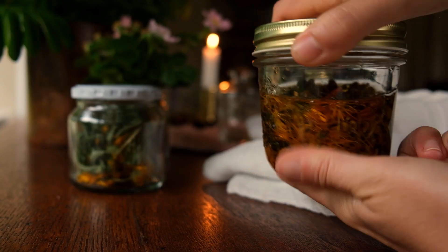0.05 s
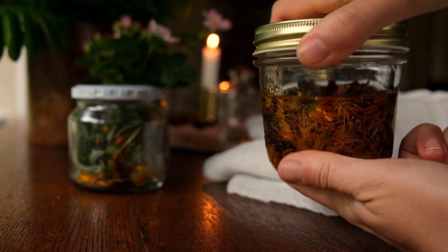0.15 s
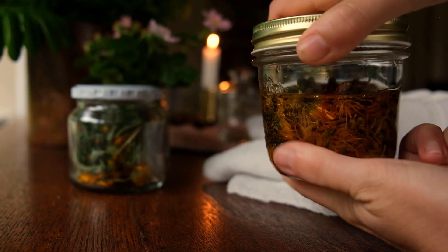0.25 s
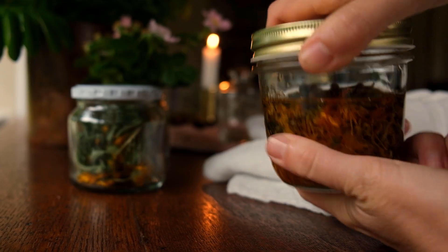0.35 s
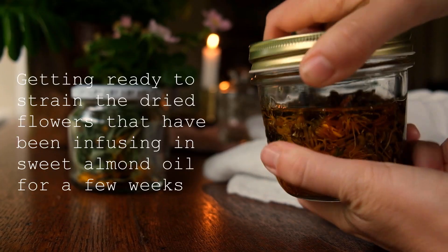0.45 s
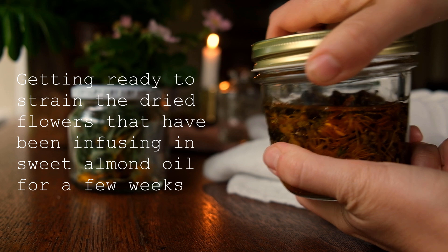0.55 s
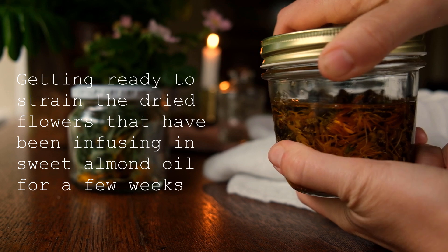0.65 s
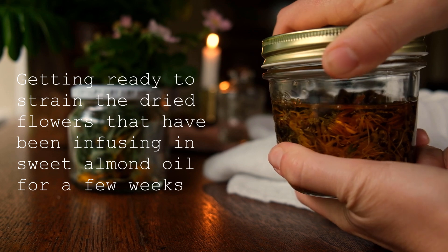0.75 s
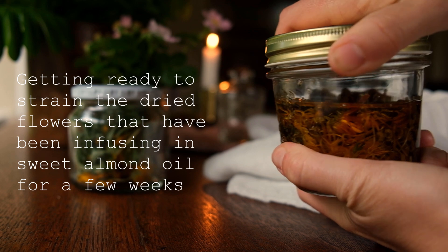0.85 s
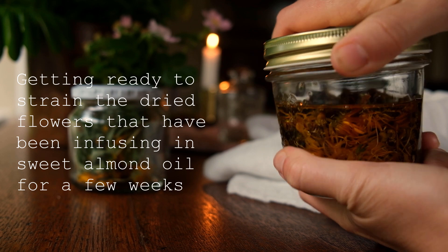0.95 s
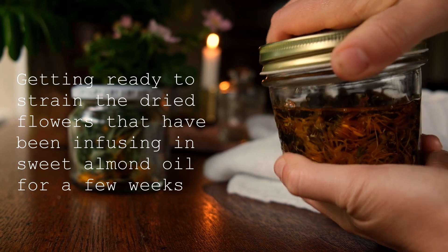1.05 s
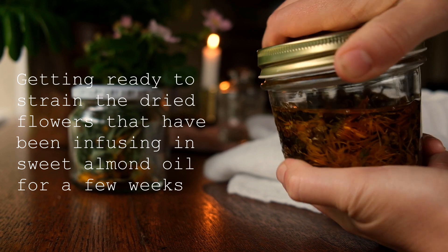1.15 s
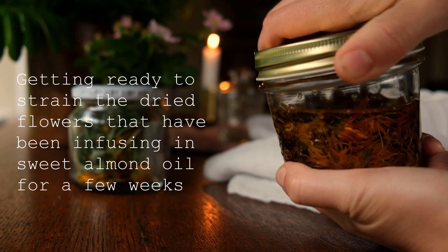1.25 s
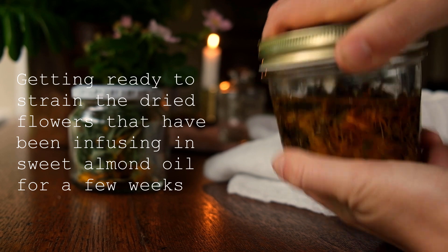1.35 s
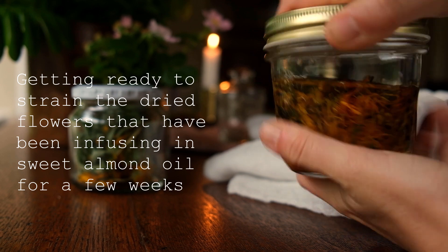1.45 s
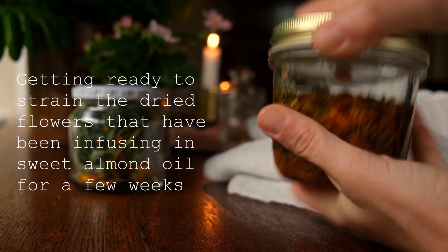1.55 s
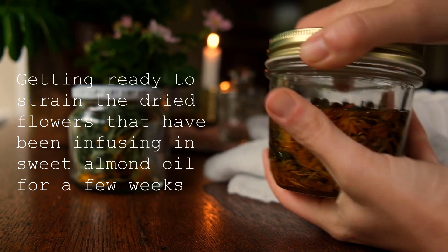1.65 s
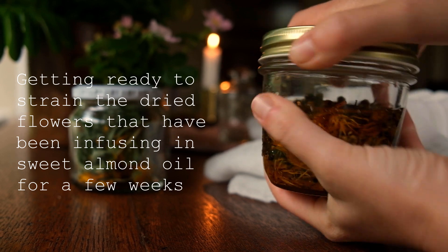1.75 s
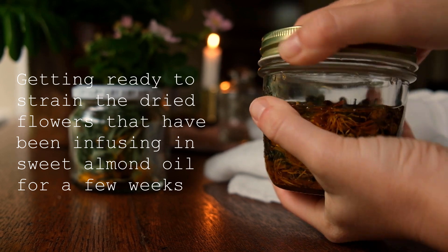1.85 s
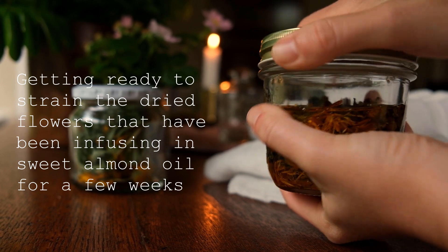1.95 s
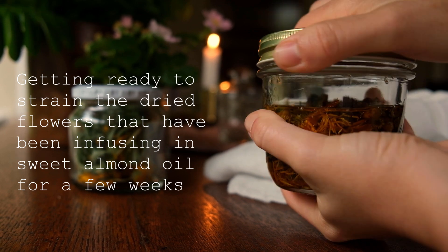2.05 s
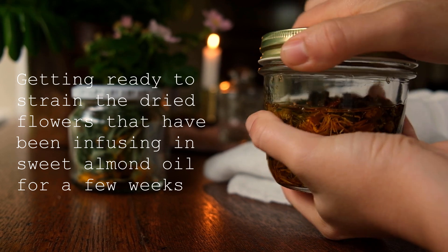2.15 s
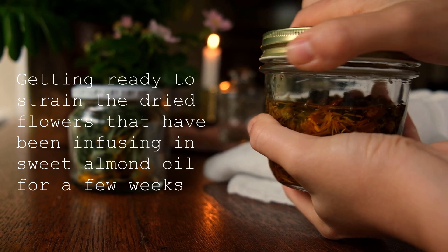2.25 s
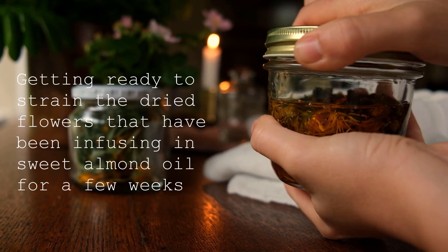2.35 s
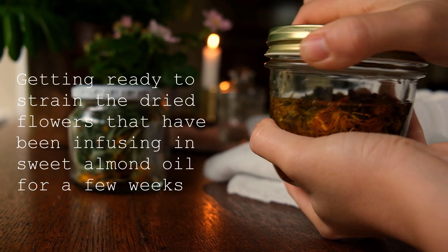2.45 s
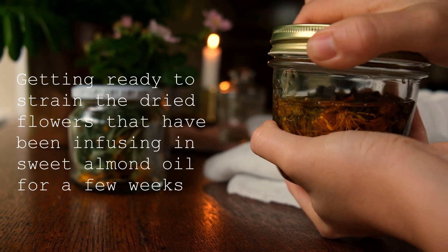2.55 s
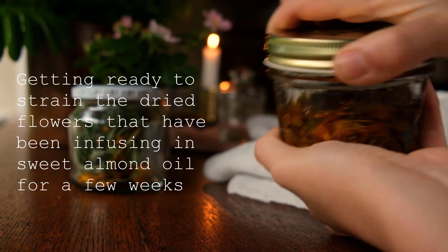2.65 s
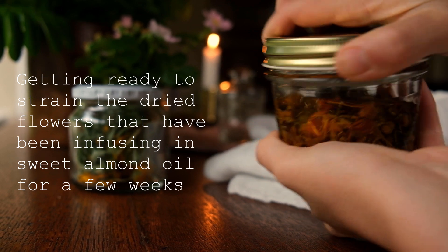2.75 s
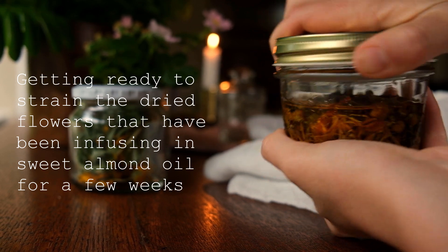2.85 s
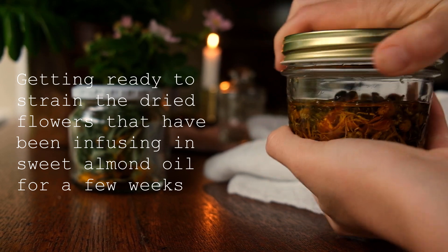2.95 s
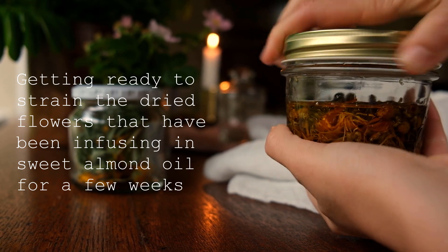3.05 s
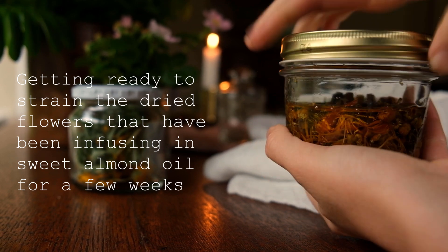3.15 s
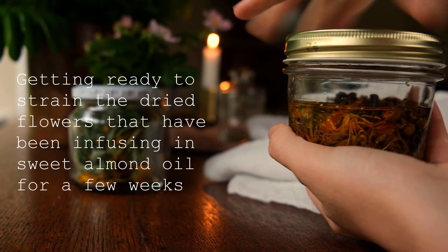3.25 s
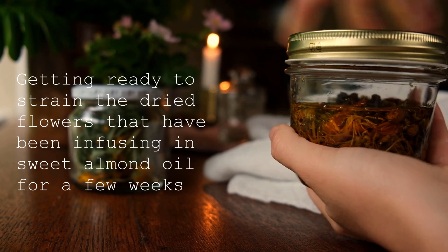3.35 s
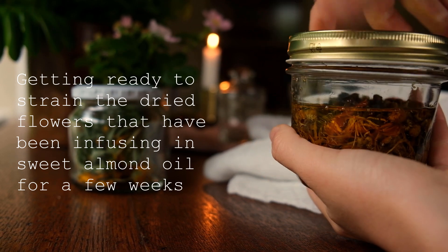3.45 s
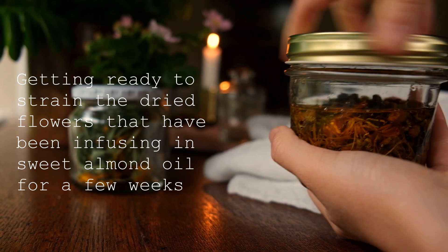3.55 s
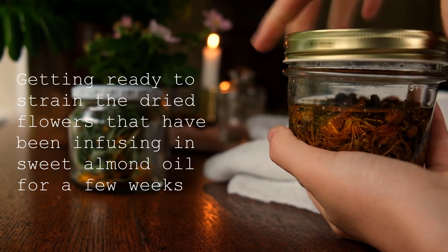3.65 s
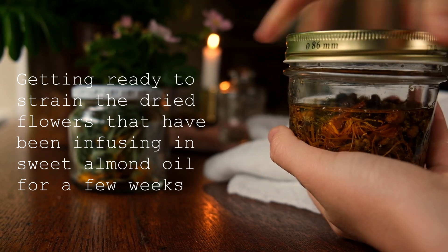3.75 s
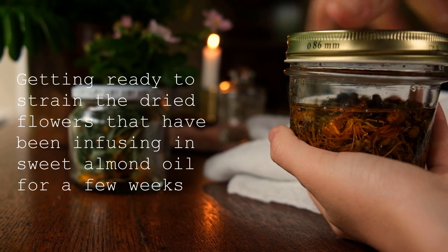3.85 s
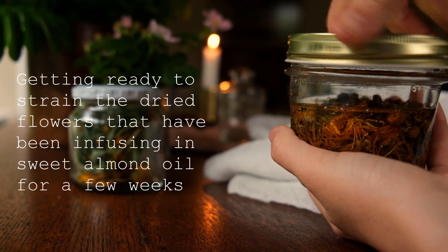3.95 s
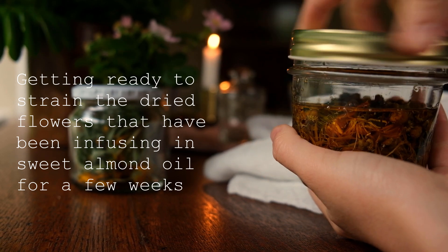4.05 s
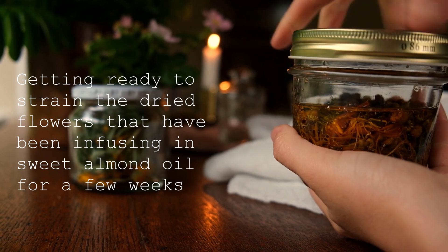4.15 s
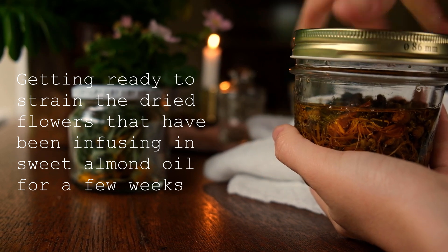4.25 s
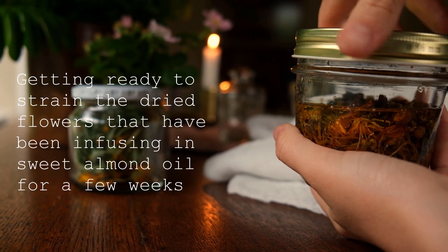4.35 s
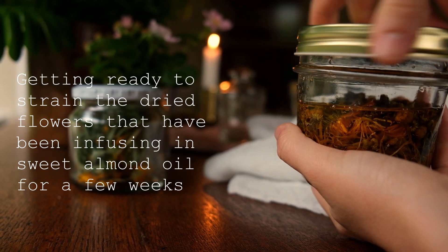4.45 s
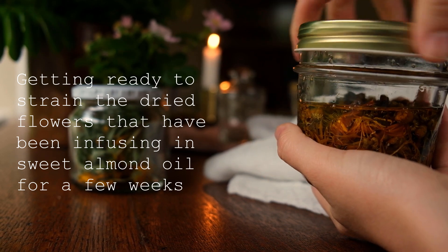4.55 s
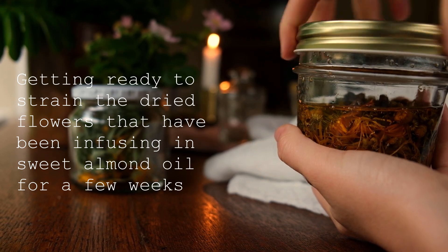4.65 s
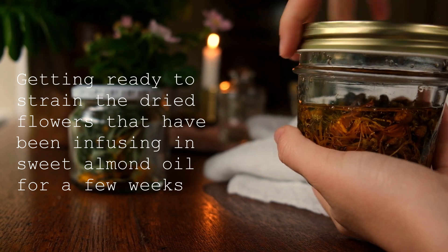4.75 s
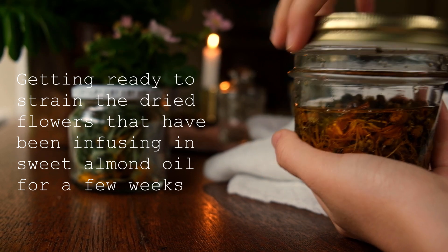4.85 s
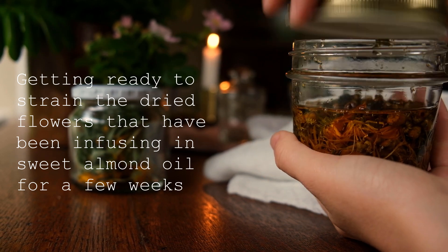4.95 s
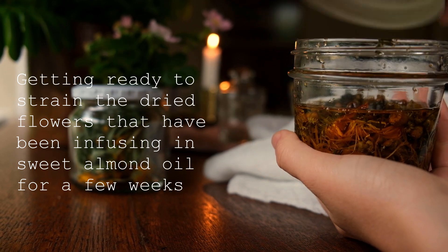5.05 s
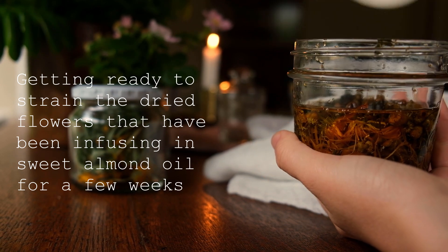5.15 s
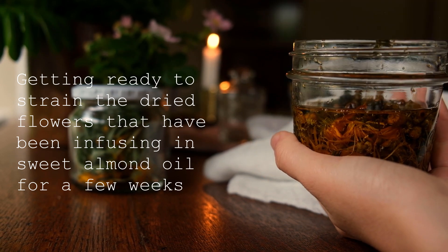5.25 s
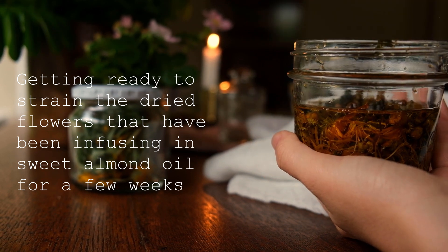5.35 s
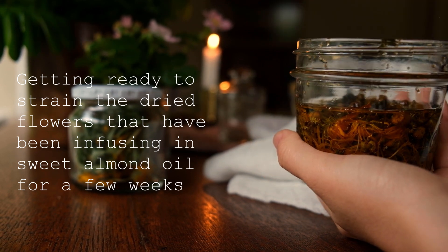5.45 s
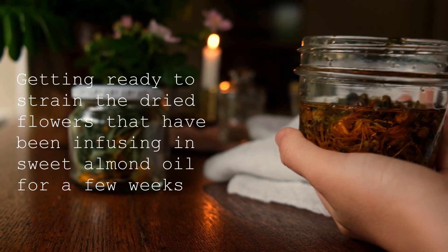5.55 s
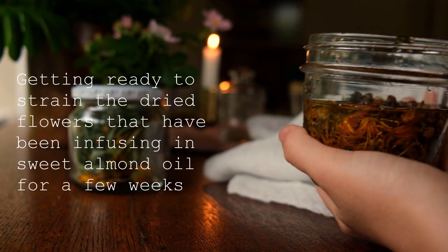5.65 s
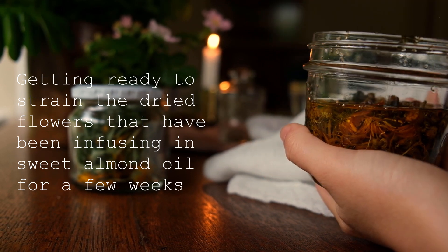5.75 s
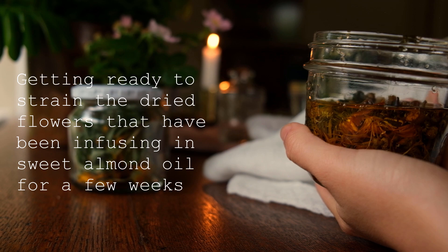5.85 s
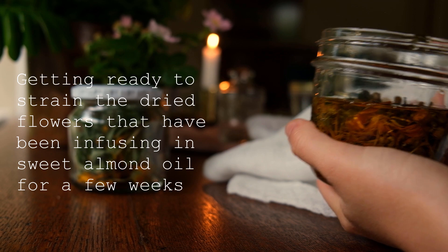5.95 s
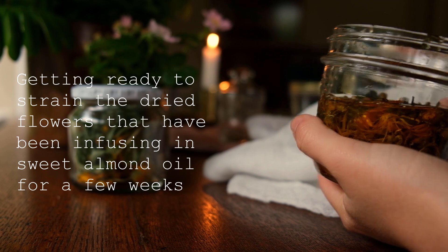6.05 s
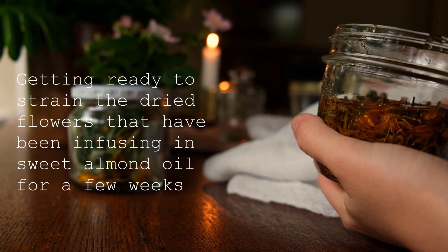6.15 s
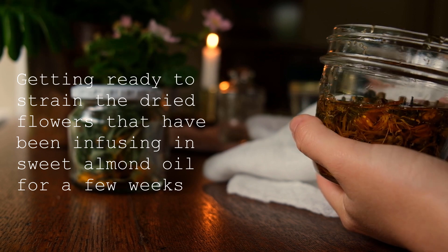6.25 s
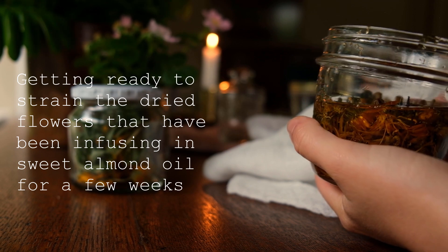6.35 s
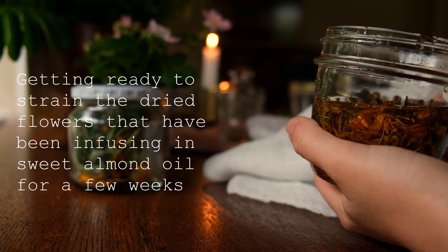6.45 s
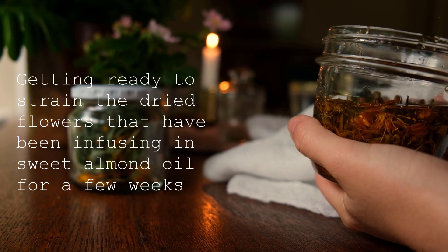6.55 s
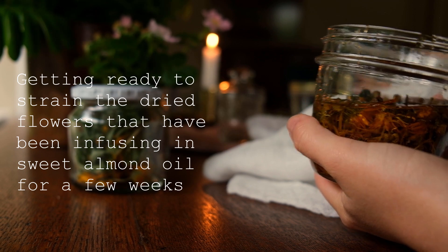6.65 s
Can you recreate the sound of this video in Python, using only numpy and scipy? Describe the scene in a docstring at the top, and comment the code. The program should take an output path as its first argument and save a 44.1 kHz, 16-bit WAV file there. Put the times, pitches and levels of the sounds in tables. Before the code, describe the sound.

Close and detailed in a hushed, fairly dry room: a dull glass knock, sparse dry ticks and skin creaks, then a bright metal snap as a tight jar lid gives way. Two brief rasping twists follow, with pauses, then a glassy knock and a sustained rough scrape, rising air pops and lifting ring. After near silence, the lid clatters softly on the table. Distant birds and low hoots are barely audible.

```python
"""Metal screw lid worked off an oil-filled glass jar by hand: grit on the thread drives ring, rub, rasp and hiss.
Handling hands rock the jar and creak; blows, finger ticks, squeaks, squeals and air pops mark the lid cracking
loose, spinning off in short scraping turns, lifting and being laid down. All are noise, slips or pushes in
filters and resonators, or wavering tones. Outside, birds and faint low hoots are gliding near-sines;
the quiet room adds banded stereo hush, a table echo, scattered treble and feedback-delay reverberation."""
import sys
import numpy as np
from scipy import signal
from scipy.fft import rfft, irfft
from scipy.io import wavfile

SR = 44100
rng = np.random.default_rng(int(sys.argv[2]) if len(sys.argv) > 2 else 0)


def volts_from_decibels(level):
    """Turn decibel levels (scalar or array-like) into linear amplitude factors."""
    exponent = np.asarray(level, float) / 20
    return 10 ** exponent


def log_audio(samples):
    """Write samples as a 16-bit WAV file to the path given in sys.argv[1]."""
    # one column per channel
    frames = np.atleast_2d(samples).T
    # limit to full scale, then quantise
    limited = np.clip(frames, -1, 1)
    pcm = np.round(limited * 32767).astype(np.int16)
    wavfile.write(sys.argv[1], SR, pcm)


N = 295911


def rms_one(x):
    """Scales a signal to rms 1."""
    return x / np.sqrt(np.mean(x ** 2) + 1e-20)


def band(x, low_hz, high_hz):
    """Second-order Butterworth band-pass."""
    return signal.sosfilt(signal.butter(2, [low_hz, high_hz], "band", fs=SR, output="sos"), x)


def drift(rate_hz):
    """Slow chance of rms 1: noise through a double pole, computed every 40 samples."""
    r = np.exp(-80 * np.pi * rate_hz / SR)
    noise = rng.standard_normal(N // 40 + 2002)
    slow = signal.lfilter([1], [1, -2 * r, r * r], noise)[2000:]
    return np.interp(np.arange(N) / 40, np.arange(len(slow)), rms_one(slow))


def resonate(modes, force, wander_db, rate_hz):
    """Parallel modes; the point of contact moves, so each mode's share wanders."""
    out = 0
    for k, (hz, width_hz, db) in enumerate(modes):
        r = np.exp(-np.pi * width_hz / SR)
        share = volts_from_decibels(db + wander_db * drift(rate_hz)) * (-1) ** k
        zeros = [(1 - r * r) / 2, 0, (r * r - 1) / 2]
        poles = [1, -2 * r * np.cos(2 * np.pi * hz / SR), r * r]
        out = out + signal.lfilter(zeros, poles, force * share + 1e-18)
    return out


def grains(per_s, spread_db):
    """Random slips of uneven size and either sign."""
    sizes = volts_from_decibels(spread_db * np.minimum(rng.exponential(1, N), 4)) * rng.choice([-1, 1], N)
    return sizes * (rng.random(N) < per_s / SR)


def levels_in_time(tables, fade_s=0.01):
    """A fade that is silent between the spans, and the interpolated columns of all spans."""
    now, fade = np.arange(N) / SR, 0
    for rows in tables:
        inside_s = np.minimum(now - rows[0][0], rows[-1][0] - now)
        fade = fade + np.clip(inside_s / fade_s + 0.5, 0, 1)
    s, *columns = np.transpose([row for rows in tables for row in rows])
    return np.minimum(fade, 1), [np.interp(now, s, c) for c in columns]


def gains_in_time(tables, fade_s=0.016):
    """Level columns of several spans as gains, silent in between."""
    fade, columns_db = levels_in_time(tables, fade_s)
    return fade * volts_from_decibels(columns_db)


def tone(rows, harmonics_db, waver, flicker_db):
    """A gliding harmonic tone, unsteady in pitch and strength."""
    s, hz, db = np.transpose(rows)
    pitch_hz = np.interp(np.arange(N) / SR, s, hz) * (1 + waver * drift(38.5))
    phase = 2 * np.pi * np.cumsum(pitch_hz) / SR
    wave = sum(volts_from_decibels(d) * np.sin((k + 1) * phase) for k, d in enumerate(harmonics_db))
    level = gains_in_time([np.transpose([s, db])])[0]
    return np.sqrt(2) * level * wave * volts_from_decibels(flicker_db * drift(55.0))


def glides(rows, harmonics_db, waver, flicker_db):
    """Notes that swell, fade and slide evenly from a first to a last pitch."""
    edge_db = 2.5    # the fade halves the gain at each end; this gives part of it back
    out = 0
    for s, length_s, first_hz, last_hz, db in rows:
        points = [(s, first_hz, db + edge_db), (s + length_s / 2, (first_hz + last_hz) / 2, db),
                  (s + length_s, last_hz, db + edge_db)]
        out = out + tone(points, harmonics_db, waver, flicker_db)
    return out


# Spectrum of the hush. Each row: frequency in Hz, relative density in dB per Hz.
HUSH_SPECTRUM = [(20, -6.5), (50, -5), (90, -9), (200, -13), (420, -9.5), (600, -16), (830, -12),
                 (1150, -20.5), (1600, -15.5), (2100, -14), (2800, -20.5), (4300, -22.5), (7000, -29),
                 (16000, -36)]
# Stereo likeness of the hush. Each row: frequency in Hz, left-right correlation from -1 to 1.
LIKENESS = [(60, -0.18), (240, 0.33), (950, 0.55), (3770, -0.26), (15000, 0.042)]
# Narrow bands standing out of the hush. Each row: frequency in Hz, width in Hz, relative gain in dB.
HUSH_BANDS = [(800, 56, -0.43), (2043, 170, -0.57)]
HUSH_DB, HUSH_BANDS_DB = -65.5, -71.5


def hush():
    """Quarter-octave bands of stereo noise, each with its level, likeness and slight wander."""
    out, edges_hz = 0, 20 * 2 ** np.arange(0, 10, 1 / 4)
    white = rng.standard_normal((2, 2, N))
    level_hz, level_db = np.transpose(HUSH_SPECTRUM)
    alike_hz, likeness = np.transpose(LIKENESS)
    for k, (low, high) in enumerate(zip(edges_hz, edges_hz[1:])):
        mid, side = band(white[k % 2], low, high)
        log_centre = np.log(low * high) / 2
        alike = np.clip(np.interp(log_centre, np.log(alike_hz), likeness), -1, 1)
        db = np.interp(log_centre, np.log(level_hz), level_db) + 0.9 * drift(3.0)
        stereo = np.sqrt(1 + alike) * mid + np.sqrt(1 - alike) * side * [[1], [-1]]
        out = out + volts_from_decibels(db) * stereo
    narrow = resonate(HUSH_BANDS, rng.standard_normal((2, N)), 0.88, 1.5)
    return volts_from_decibels(HUSH_DB) * rms_one(out) + volts_from_decibels(HUSH_BANDS_DB) * rms_one(narrow)


# Far birds. Each row: start in seconds, length in seconds, first pitch in Hz, last pitch in Hz, level in dB.
BIRDS = [(1.32, .25, 3380, 3490, -83), (1.67, .15, 4090, 4060, -85), (1.94, .13, 4540, 4500, -84),
         (5.14, .12, 2640, 3050, -80), (5.24, .17, 3200, 3400, -81.5)]
# Faint low hoots. Each row: start in seconds, length in seconds, first pitch in Hz, last pitch in Hz, level in dB.
HOOTS = [(1.82, 0.1, 344, 356, -76.5), (2.05, 0.091, 372, 369, -72.5), (2.27, 0.069, 374, 404, -63.5),
         (3.79, 0.15, 405, 476, -73.5), (3.78, 0.14, 800, 800, -76), (5.19, 0.064, 874, 870, -72),
         (5.25, 0.082, 370, 404, -78), (5.42, 0.092, 815, 834, -74), (5.49, 0.15, 392, 470, -74),
         (5.68, 0.11, 380, 433, -68.5), (5.75, 0.051, 875, 870, -73)]


def outside():
    """Birds and hoots, near sines broken up by distance."""
    return glides(BIRDS, [0], 0.007, 2.5) + glides(HOOTS, [0], 0.0113, 3.3)


def room(x):
    """Six feedback delays a side, duller on every round."""
    t60_s, wall_cut_hz = 0.24, 3400
    out, dull = np.zeros((2, N)), np.exp(-2 * np.pi * wall_cut_hz / SR)
    lags = (rng.uniform(0.0073, 0.026, 12) * SR).astype(int)
    for k, lag in enumerate(lags):
        loop, gain, state = x.copy(), volts_from_decibels(-60 * lag / SR / t60_s), [0.]
        for i in range(lag, N, lag):
            back, state = signal.lfilter([gain * (1 - dull)], [1, -dull], loop[i - lag:i], zi=state)
            loop[i:i + lag] += back[:N - i]
        out[k % 2] += (loop - x) * (-1) ** (k // 2)
    return out


def scattered(x):
    """The lid throws its treble differently to each side: milliseconds of tiny echoes, opposite on the two sides."""
    decay_s, low_hz, level_db = 0.0042, 1510, -4.5
    after_s = np.arange(SR // 20) / SR
    echoes = rng.standard_normal(len(after_s)) * np.exp(-after_s / decay_s)
    echoes = echoes / np.sqrt(np.sum(echoes ** 2))
    treble = band(signal.fftconvolve(x, echoes)[:N], low_hz, 12000)
    return volts_from_decibels(level_db) * treble * [[1], [-1]]


def placed(jar):
    """Jar right of centre: left is later and softer in the treble; the table top echoes early to each side."""
    left_lag_s, left_db, shadow_hz = 2.6e-5, -1.8, 700
    table_echo_s, table_echo_db = (0.000617, 0.00047), -20    # left, right
    turn = -2j * np.pi * np.fft.rfftfreq(N, 1 / SR)
    shadow = 1 / (1 + 2 * np.pi * shadow_hz / (np.abs(turn) + 1))
    direct = volts_from_decibels(np.outer([left_db / 2, -left_db / 2], shadow)) * np.exp(np.outer([left_lag_s, 0], turn))
    echo = volts_from_decibels(table_echo_db) * np.exp(np.outer(table_echo_s, turn))
    return irfft(rfft(jar) * (direct + echo), N)


# Seal squeaks. Each row: start in seconds, length in seconds, first pitch in Hz, last pitch in Hz, level in dB.
SQUEAKS = [(2.4, 0.053, 400, 444, -58.5), (2.422, 0.033, 429, 401, -53), (2.463, 0.035, 420, 435, -49)]
# Their harmonics. Each entry: level in dB, from the fundamental up.
SQUEAK_HARMONICS_DB = [-5, -7, -13.5, -25.5]


def squeaks():
    """The seal squeaks: short wavering harmonic glides."""
    return glides(SQUEAKS, SQUEAK_HARMONICS_DB, 0.04, 3.9)


# Air pops, higher as the gap under the lid opens. Each row: peak time in seconds, pitch in Hz, level in dB.
POPS = [(4.845, 450.6, -31.5), (4.89, 730, -38), (4.917, 875, -26.5)]


def pops():
    """Air in the jar pops: each tone swells, dies and slides upward."""
    rise_s, fall_s, glide, edge_db = 0.0029, 0.0096, 0.029, -14.5
    out = 0
    for s, hz, db in POPS:
        points = [(s - rise_s, hz * (1 - glide), db + edge_db), (s, hz, db),
                  (s + fall_s, hz * (1 + glide), db + edge_db)]
        out = out + tone(points, [0], 0.035, 2.6)
    return out


# Squeals. Each row: start in seconds, length in seconds, lowest mode in Hz, starting level in dB.
SQUEALS = [(3.535, 0.023, 2285, -45), (3.552, 0.014, 2200, -47), (3.975, 0.022, 2420, -56.5),
           (4.877, 0.02, 2170, -47)]
# Binding rim. Each row: multiple of the lowest mode, width relative to the mode's frequency, gain in dB.
RIM = [(1.0, 0.048, 5), (1.62, 0.03, -1.5), (2.25, 0.05, -10), (3.05, 0.05, -16)]


def squeals():
    """The rim binds on the thread: sudden dense slips into its few broad modes."""
    out = 0
    for s, length_s, hz, db in SQUEALS:
        slips = rng.standard_normal(N)
        modes = [(hz * times, hz * times * width, d) for times, width, d in RIM]
        level = gains_in_time([[(s, db), (s + length_s, db - 4.0)]], fade_s=0.0035)[0]
        out = out + level * rms_one(resonate(modes, slips, 1.9, 25))
    return out


# Free lid. Each row: frequency in Hz, width in Hz, gain in dB.
LID = [(1078, 30.3, 8.5), (1260, 147, -6.5), (1440, 130, -17.5), (1713, 23, 3.5), (1890, 120, -9),
       (2240, 110, -6.5), (2455, 52, 2), (2616, 54, -1.5), (2844, 39, -3), (2990, 59, -18),
       (3840, 77, -19.5), (4370, 35, -18), (5210, 170, -16), (5980, 49, -17.5)]
GRIPPED_S, GRIP_WIDENS = 2.7, 2.2    # until then the clamping hand shortens the ring
LAID_S, LAID_DB = 5.5, -8    # from then the lid is taken as lying on the table


def lid_modes(force, wander_db, count):
    """First modes of the lid: broad while gripped, free while spun, fainter once laid down."""
    now_s = np.arange(N) / SR
    gripped = [(hz, width * GRIP_WIDENS, db - 20 * np.log10(GRIP_WIDENS)) for hz, width, db in LID[:count]]
    held_force = force * (now_s < GRIPPED_S)
    free_force = force * (now_s >= GRIPPED_S) * volts_from_decibels(LAID_DB * (now_s > LAID_S))
    return resonate(gripped, held_force, wander_db, 11) + resonate(LID[:count], free_force, wander_db, 17.7)


def lid(force):
    """Sheet metal: narrow modes over a broad clatter that falls away steeply above 5 kHz."""
    modes = band(lid_modes(force, 3.0, count=len(LID)), 700, 7000)
    clatter = band(band(force, 800, 5000), 600, 6500)
    return modes + volts_from_decibels(-7.0) * clatter


def grit_band(force):
    """The brightest part of a contact."""
    return band(band(force, 6400, 16100), 6600, 16400)


# Dry ticks of fingers on the lid. Each row: time in seconds, snap peak in dB, colour of the snap in Hz.
TICKS = [(0.7124, -53, 4240), (0.79, -53, 4300), (0.863, -49, 2900), (0.9348, -55, 3940),
         (0.9493, -56, 6600), (1.0175, -50.5, 3630), (1.041, -52, 6100), (1.135, -55, 2970),
         (1.1528, -54, 2770), (1.1901, -53.5, 3970), (1.816, -54, 7160), (2.134, -54, 4000),
         (2.403, -59, 8000), (2.482, -56.5, 8000), (5.933, -54, 9000)]


def ticks():
    """Fingers on the lid: short thin snaps, each with its own colour, and a trace of lid ring."""
    out, snaps, after_s = np.zeros(N), np.zeros(N), np.arange(SR // 50) / SR
    for s, db, hz in TICKS:
        burst = rng.standard_normal(len(after_s)) * np.exp(-after_s / 0.0011)
        snap = band(band(burst, hz / 2.3, hz * 1.3), hz / 3.1, hz * 1.4)
        i = round(s * SR)
        out[i:i + len(after_s)] += volts_from_decibels(db) * snap / np.max(np.abs(snap))
        snaps[i] = volts_from_decibels(db)
    return out + volts_from_decibels(21.0) * lid(snaps)


# Hands straining on the lid, at last handling it as it is laid down, in spans.
# Each row: time in seconds, jar hum in dB, creak level in dB.
HANDLING = [
    [(0.11, -54, -53.5), (0.24, -67.5, -76)],
    [(0.55, -65, -93), (0.66, -64, -81), (0.76, -60.5, -60.5), (0.81, -62.5, -69.5), (0.92, -57, -60),
     (1.0, -64, -67), (1.05, -62, -58.5), (1.1, -57, -69.5), (1.2, -58.5, -58.5), (1.35, -69, -96)],
    [(2.0, -72, -73), (2.356, -61, -69), (2.45, -63, -63), (2.51, -59, -57.5), (2.58, -53.5, -55)],
    [(2.62, -55, -63), (2.75, -58, -79), (2.886, -53.5, -67), (3.3, -73.5, -76)],
    [(5.97, -80, -70.5), (6.282, -66, -63.5), (6.55, -82, -85)],
]
# Grip slips that rock the jar. Each row: time in seconds, push size in dB.
JOLTS = [(0.098, -40.5), (0.566, -49.5), (0.619, -56), (0.717, -58), (0.764, -49), (0.821, -53),
         (0.905, -48), (1.046, -47.5), (1.135, -52), (1.176, -58), (1.602, -60), (2.411, -56), (2.553, -52),
         (2.602, -38.5), (2.81, -51), (2.886, -70), (2.943, -53), (2.988, -61), (3.046, -61), (3.502, -49),
         (3.535, -60), (6.278, -55.5), (6.377, -54)]
# Full jar rocking in the hand. Each row: frequency in Hz, width in Hz, gain in dB.
JAR = [(90.5, 85, -9.5), (143.5, 22, -3), (169.5, 34.5, -11.5), (45.2, 133, -16.5)]
# Creaking jar and lid. Each row: frequency in Hz, width in Hz, gain in dB.
CREAK = [(491, 35, 3), (746, 43, 6), (1027, 37, -3)]


def handling():
    """Skin and seal stick and slip: tremor and jolts rock the jar, quicker slips creak in glass and lid."""
    tremor, creaking = gains_in_time(HANDLING)
    hum = tremor * rms_one(resonate(JAR, band(grains(270, 0.43), 25, 340), 4.7, 2.4))
    pushes = np.zeros(N)
    for s, db in JOLTS:
        pushes[round(s * SR)] = volts_from_decibels(db) * rng.choice([-1, 1])
    soft = band(pushes, 45, 430)    # flesh gives a soft push
    jolts = resonate(JAR, soft, 2.0, 0.5) * SR / (np.pi * JAR[1][1])
    slips = grains(500, 0.89) * volts_from_decibels(2.0 * drift(18))
    voiced = resonate(CREAK, slips, 2.5, 11.4)
    rustle = band(slips, 180, 1430)    # of the skin
    creak = rms_one(voiced) + volts_from_decibels(-6) * rms_one(rustle)
    return hum + jolts + creaking * rms_one(creak)


# Glass. Each row: frequency in Hz, width in Hz, gain in dB.
GLASS = [(289, 69, 3), (420, 123, 4), (525, 160, 8.5), (704, 137, 6.5), (805, 68, 10.5), (806, 710, -9)]


def struck_glass(force):
    """Glass ring with a dead first pulse."""
    thud_db = -8
    return band(resonate(GLASS, force, 0.69, 1.0) + volts_from_decibels(thud_db) * force, 220, 1090)


def dead_knock(force):
    """A narrow dull knock with the two lowest lid modes."""
    dull = band(band(band(force, 740, 1770), 720, 1800), 560, 1760)
    return dull + volts_from_decibels(3.0) * resonate(LID[:2], force, 0.22, 4.7)


# Blows. Each row: time in seconds, nominal lid ring peak in dB, nominal glass peak in dB,
# contact decay constant in ms, bright crack over the lid ring in dB.
BLOWS = [(0.094, -59, -28, 7.6, -19), (2.1692, -39, -50, 3, -18), (2.1786, -40.5, -57, 3, -17),
         (2.218, -53, -50, 1.1, -20), (2.2733, -36, -46, 8, -11), (2.279, -31.5, -56, 9.2, -15),
         (2.5313, -84, -43.5, 6.8, -18), (2.5949, -9.5, -27, 0.23, -16.5), (2.5974, -11, -33, 5.8, -24),
         (2.613, -21.5, -55, 3.6, -20), (2.7401, -70, -47, 10, -17), (3.1349, -44, -57, 3.1, -26),
         (3.4983, -90, -49, 1.1, -18), (3.5067, -94, -38, 1.8, -18), (3.5347, -40.5, -45, 15, -3),
         (3.565, -26, -46, 2.7, -20), (3.5969, -25.5, -50, 8, -8), (3.6215, -32, -28, 18, -6.5),
         (3.9741, -45, -41, 13, -21), (4.0067, -34, -43, 3.5, -27), (4.0113, -24, -43, 3.4, -28),
         (4.4703, -34, -20, 0.24, -25), (4.5159, -29, -35, 2.7, -34), (4.535, -37, -32.5, 43, -19),
         (4.9098, -17.5, -34, 2.5, -15.5), (4.9144, -22.5, -40.5, 3, -23), (6.2772, -32.5, -34.5, 5.2, -22),
         (6.2951, -27, -41, 8.6, -14), (6.3106, -20, -51, 24, -19), (6.4285, -54, -52, 7.3, -16),
         (6.4478, -53, -43.5, 1.6, -18), (6.4983, -51, -52.5, 20, -18)]


def blows():
    """Each blow is a short dying burst of force into lid, glass, a bright crack and a dead knock."""
    knock_offset_db, knock_lid_share = -3, 0.077
    rattle_db, rattle_s, crunch_s = -16, 0.023, 0.0084
    length = SR // 4
    after_s = np.arange(length) / SR
    bodies = [lid, struck_glass, grit_band, dead_knock]
    force = np.zeros((4, N + length))
    impulse = np.eye(1, N)[0]
    unit_peaks = [np.max(np.abs(signal.hilbert(body(impulse)[:length]))) for body in bodies]
    for s, lid_db, glass_db, contact_ms, crack_db in BLOWS:
        noise = rng.standard_normal(length)
        knock_db = knock_offset_db + knock_lid_share * lid_db + (1 - knock_lid_share) * glass_db
        peak_db = np.array([lid_db, glass_db, lid_db + crack_db, knock_db])
        burst = noise * np.exp(-after_s / (contact_ms / 1000))
        burst += volts_from_decibels(rattle_db) * noise * np.exp(-after_s / rattle_s)    # loose parts rattle on
        burst[0] += 9.0    # the first touch is a sharp tick
        burst = burst / np.sqrt(np.sum(burst ** 2))
        crunch = 0.21 * noise * np.exp(-after_s / crunch_s)    # grit crunches for a moment
        i = round(s * SR)
        force[:, i:i + length] += volts_from_decibels(peak_db)[:, None] * burst
        force[2, i:i + length] += volts_from_decibels(peak_db[2]) * crunch
    return sum(body(f[:N]) / peak for body, f, peak in zip(bodies, force, unit_peaks))


# Lid rubbing on the thread, at last sliding on the table, in spans. Each row: time in seconds,
# pressure as reference level of the glass rub in dB, freedom as lid ring over that in dB,
# slip as rasp over that in dB.
TURNS = [
    [(2.63, -55, -6, -10), (2.694, -66.5, 3.5, -6), (2.8, -56.5, -26, -30), (2.806, -67, -16, -24),
     (2.86, -58.5, -24, -35), (2.898, -60, -5.5, -22), (2.918, -60.5, -28, -33), (2.994, -57, -8, -24),
     (3.056, -62, -5, -15), (3.092, -51, 3, -8.5), (3.19, -73, -13, -18)],
    [(3.528, -63, -10, -14), (3.536, -43.5, -15, -17), (3.55, -70, 2, 8), (3.564, -56, 10, -1),
     (3.586, -45, -10, -3.5), (3.61, -45, 1, 7.5), (3.63, -38, -8.5, -19), (3.656, -45, -4, -17),
     (3.694, -48.5, -21, -26), (3.726, -73, -16, -8), (3.74, -71, 2, -11)],
    [(3.95, -59, -8, -12), (3.962, -65, -24, -30), (3.974, -45.5, -23, -21), (3.986, -53.5, 6, -8.5),
     (4.042, -45.5, 5, 6.5), (4.062, -43, 4.5, -2), (4.072, -50, 5, 10.5), (4.114, -56, 7.5, -13),
     (4.124, -54.5, 8.5, -17), (4.174, -70, -23, -10), (4.18, -70, -6, -14)],
    [(4.325, -79, -1, -22), (4.337, -58, -25, -18), (4.349, -57, -26, -31), (4.369, -69, -24, -18),
     (4.385, -54.5, -15, -29), (4.411, -54, 1, -12), (4.433, -47, -17, -35), (4.443, -61, -3, -22),
     (4.461, -52, -15, -23), (4.465, -54, -22, -29)],
    [(4.48, -40, -7, -27), (4.51, -42.5, -12, -12), (4.52, -45, 9, -14), (4.532, -42, -1.5, -15),
     (4.566, -45, -9, -17), (4.576, -49, 0, -13), (4.608, -51.5, -2.5, -15), (4.616, -50, 0.5, -12),
     (4.652, -39.5, -9.5, -19), (4.69, -43.5, -8.5, -18), (4.718, -45.5, -11, -18),
     (4.75, -42.5, -10.5, -15.5), (4.764, -44, -1, -13.5), (4.822, -36.5, -18.5, -29.5),
     (4.834, -38.5, -13.5, -23), (4.848, -48, -6, -18), (4.864, -49.5, -6.5, -19), (4.878, -60.5, 5, 0.5),
     (4.896, -50, -9, -10), (4.905, -42, -11, -38)],
    [(6.3, -50.5, 11, -5), (6.314, -54.5, 20, 3), (6.326, -58, 7, -6), (6.34, -67.5, 17.5, 14),
     (6.4, -69.5, 9.5, 3), (6.418, -79.5, 21, 10), (6.428, -65, -5, -8), (6.44, -63, 1, -6)],
]
# Rasp zones. Each entry: zone edge in Hz.
RASP_EDGES_HZ = [2770, 4020, 4930, 5340, 6760, 8860, 11900]
UPPER_RUB_DB, LOWER_RUB_DB = -2.5, -2.5
HISS_AT_ZERO_SLIP_DB, HISS_DB_PER_SLIP_DB = -13.5, 1.25    # faster slip hisses
RASP_STEP_DB, RASP_WANDER_DB = -1.5, 2.9    # each higher zone is softer
# From LIFTED_S the lid rides loose: stronger but duller hiss, duller rasp, less deep rub of the thread.
LIFTED_S, LIFTED_HISS_DB, LIFTED_LOSS_DB = 4.47, 9.5, -10
LIFTED_STEP_DB, LIFTED_CUT_HZ = -3, 10800


def rasp_zones(grit, loose):
    """Grit in adjoining bands whose levels wander, so the brightest zone moves as the lid turns."""
    out, step_db = 0, RASP_STEP_DB + LIFTED_STEP_DB * loose
    for k, (low, high) in enumerate(zip(RASP_EDGES_HZ, RASP_EDGES_HZ[1:])):
        level = volts_from_decibels(step_db * k + RASP_WANDER_DB * drift(27))
        out = out + band(grit, low, high) * level * (-1) ** k
    return out


def turns():
    """Grit on the thread drives lid, glass, rasp and hiss, all catching at the same moments."""
    fade, (pressure_db, freedom_db, slip_db) = levels_in_time(TURNS, fade_s=0.0036)
    loose = np.arange(N) > LIFTED_S * SR
    ring_gain = fade * volts_from_decibels(pressure_db + freedom_db)
    rasp_gain = fade * volts_from_decibels(pressure_db + slip_db)
    hiss_db = HISS_AT_ZERO_SLIP_DB + HISS_DB_PER_SLIP_DB * slip_db + LIFTED_HISS_DB * loose
    hiss_gain = fade * volts_from_decibels(pressure_db + hiss_db)
    upper_gain = fade * volts_from_decibels(pressure_db + UPPER_RUB_DB + 1.7 * drift(23.0))
    lower_gain = fade * volts_from_decibels(pressure_db + LOWER_RUB_DB + LIFTED_LOSS_DB * loose + 1.7 * drift(23.0))

    catch = volts_from_decibels(np.where(loose, 1.0, 1.5) * drift(80))
    grit = catch * grains(6000, 2.0)
    drag = np.sqrt(catch) * band(grains(2500, 1.32), 95, 2200)    # broad, soft contact reaches the glass
    upper_rub = upper_gain * rms_one(resonate(GLASS[2:], drag, 2.3, 8.6))
    lower_rub = lower_gain * rms_one(resonate(GLASS[:2], drag, 1.0, 4.6))
    ring = rms_one(lid_modes(grit, 3.2, count=9)) + volts_from_decibels(-5.5) * rms_one(band(grit, 780, 2300))
    upper_modes = resonate(LID[9:], grit, 3.0, 18)
    rasp = rms_one(rasp_zones(grit, loose)) + volts_from_decibels(-3) * rms_one(upper_modes)
    bright = grit_band(grit)
    hiss = np.where(loose, band(bright, 3800, LIFTED_CUT_HZ), bright)
    return (ring_gain * rms_one(ring) + upper_rub + lower_rub
            + hiss_gain * rms_one(hiss) + rasp_gain * rms_one(rasp))


def scene():
    """Jar sounds placed in the room, over the outside and the hush."""
    room_db = -21
    jar = turns() + handling() + blows() + ticks() + squeaks() + pops() + squeals()
    return placed(jar) + scattered(jar) + volts_from_decibels(room_db) * room(jar) + outside() + hush()


def roll_off(x):
    """The treble ends steeply here."""
    return signal.sosfilt(signal.butter(12, 16500, fs=SR, output="sos"), x)


def record(dry):
    """Turns the finished mix into the output."""
    return roll_off(dry)


dry = scene()
out = record(dry)
log_audio(out)
```